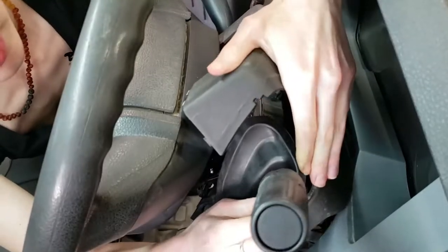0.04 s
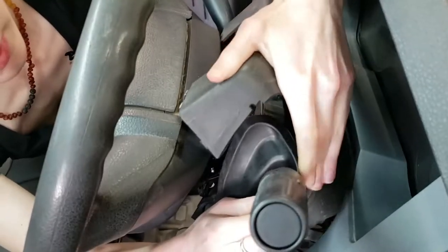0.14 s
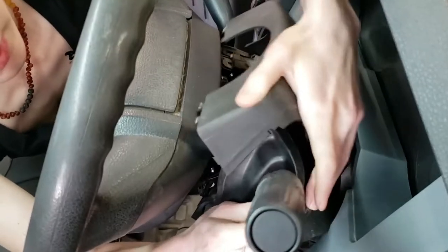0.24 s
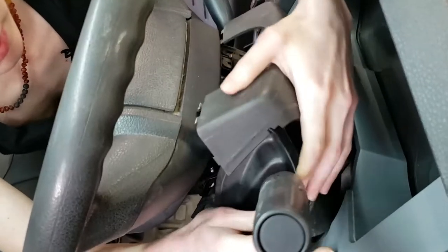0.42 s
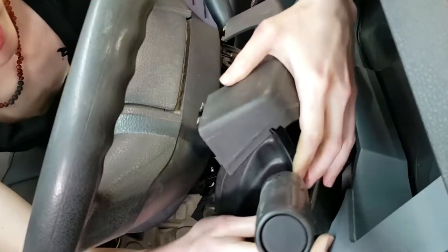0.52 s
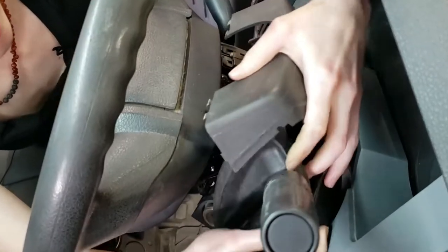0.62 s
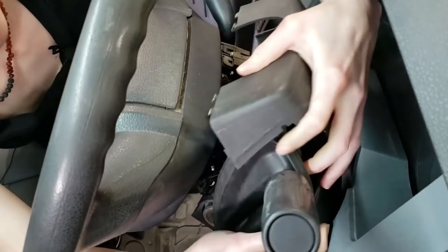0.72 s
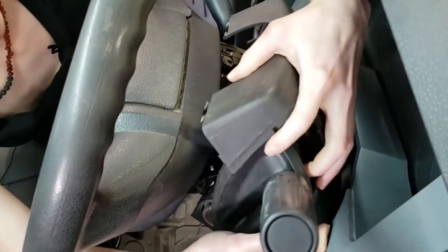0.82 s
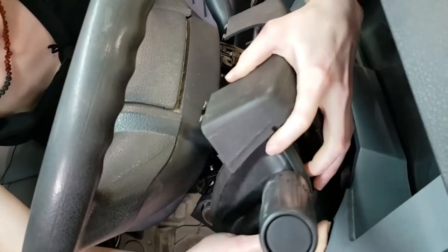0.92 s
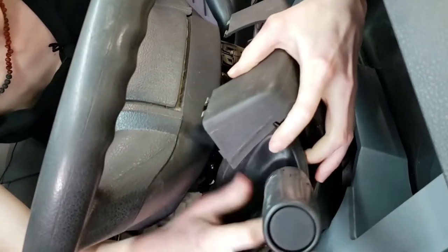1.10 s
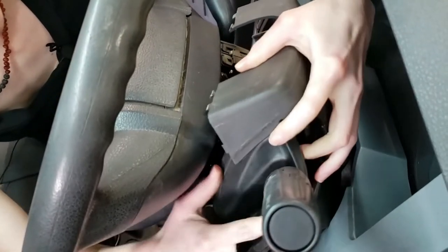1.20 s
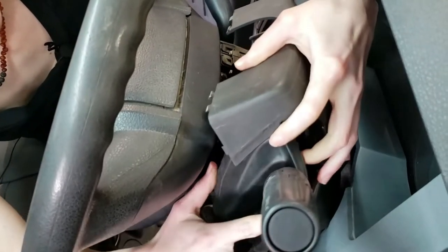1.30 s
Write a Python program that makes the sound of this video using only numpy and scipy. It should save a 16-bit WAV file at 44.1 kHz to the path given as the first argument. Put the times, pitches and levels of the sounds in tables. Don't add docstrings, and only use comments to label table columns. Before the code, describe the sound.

A hollow plastic cover is pressed into place, close and dry in a quietly humming car cabin. Faint scrapes and ticks lead to a loud, tight clatter of knocks at 0.2-0.26 s with a dull low thud. Small irregular creaks run from 0.3 to 0.6 s, ending in a light rattle. A crisp tap lands at 0.8 s, faint scuffs around 1.0-1.1, a softer tap at 1.19, then tiny scrapes.

```python
import sys
import numpy as np
from scipy import signal
from scipy.io import wavfile
from scipy.ndimage import uniform_filter1d

SR = 44100
rng = np.random.default_rng(int(sys.argv[2]) if len(sys.argv) > 2 else 0)


def undo_db(level):
    steps = np.asarray(level, float) / 20
    return 10 ** steps


def int16_out(signal):
    q = np.round(np.clip(np.atleast_2d(signal).T, -1, 1) * 32767)
    wavfile.write(sys.argv[1], SR, q.astype(np.int16))


N = 59535


def evened(x):
    return x / np.sqrt(np.mean(x ** 2) + 1e-20)


def read(points, hz):
    f, value = np.transpose(points)
    return np.interp(np.log(hz + 1), np.log(f + 1), value)


def add(mix, s, sound):
    part = mix[max(round(s * SR), 0):][:len(sound)]
    part += sound[:len(part)]


def progress(length_s):
    return np.arange(0, length_s, 1 / SR) / length_s


def causal(db):
    log = np.log(undo_db(np.concatenate([db, db[-2:0:-1]])))
    return np.fft.ifft(np.exp(np.conj(signal.hilbert(log)))).real[:2048]


def ring(modes, tune=1, damp=1):
    t = np.arange(4096) / SR
    return sum(undo_db(db - 60 * damp * t / t60) * np.sin(2 * np.pi * hz * tune * t)
               for hz, db, t60 in modes)


def struck(modes, tune=1):
    contact_s = .0004
    blow = np.convolve(np.hanning(round(contact_s * SR)), ring(modes, tune))
    return blow / abs(blow).max()


def impacts(shape, per_s, spread_db):
    chance, size, sign = rng.random((3, 12000))[:, :len(shape)]
    hits = (chance < per_s / SR) * undo_db(-spread_db * np.log(size + 1e-3)) * np.sign(sign - .5)
    return evened(hits + 1e-9) * shape


def noise(colour, size, patchy_db):
    hz = np.fft.rfftfreq(size, 1 / SR)
    re, im, patch = rng.standard_normal((N * 4 // size + 5, len(hz), 3)).T
    patch = uniform_filter1d(patch, 9, 0)
    patch = evened(uniform_filter1d(patch, 7, 1))
    spectra = (re + 1j * im) * undo_db(read(colour, hz)[:, None] + patchy_db * patch)
    return evened(signal.istft(spectra, nperseg=size, noverlap=size * 3 // 4)[1][:N])


# t/s, f/Hz, peak/dB, rise/s, T60/s
THUDS = [(0.061, 82.1, -41, 0.02, 1), (0.132, 97, -31.5, 0.012, 0.13), (0.188, 92.9, -24, 0.0064, 0.37),
         (0.23, 66.7, -23.5, 0.024, 0.14), (.31, 55.4, -34.5, 0.031, 0.27),
         (0.627, 162, -34.5, 0.016, 0.04), (.655, 89.8, -27.5, 0.027, 0.17), (0.898, 53, -45, 0.019, 0.28),
         (1.199, 62.4, -42.5, 0.018, 0.14), (1.264, 83.4, -48.5, 0.0086, 0.14), (.0, 112, -42, 0.036, 0.21),
         (.126, 335, -33, 0.0098, 0.046), (1.08, 486, -44.5, 0.022, 0.059), (1.338, 872, -45, 0.01, 0.019),
         (0.151, 181.3, -37, 0.017, 0.17), (.858, 102.5, -47, 0.016, .12)]


def column():
    out, t = np.zeros(N), np.arange(0, .4, 1 / SR)
    for s, hz, db, rise_s, t60 in THUDS:
        swell = np.sin(np.pi / 2 * np.minimum(t / rise_s, 1)) ** 2
        decay = undo_db(db - 60 * np.maximum(t - rise_s, 0) / t60)
        add(out, s, decay * swell * np.sin(2 * np.pi * hz * t))
    return out


# t/s, level/dB
RUB = [(0, -100), (0.069, -62), (0.109, -75.5), (.16, -60.5), (.3, -98), (0.349, -61.5), (0.401, -79.5),
       (0.551, -71), (.6, -59.5), (.7, -64), (0.851, -69.5), (.95, -82), (1.1, -64), (1.15, -91.5),
       (1.22, -62), (1.3, -92), (1.35, -81.5)]
# f/Hz, density/dB
SKIN = [(1500, -17), (2600, -4), (3300, -10), (5000, -14), (8500, -17), (11800, -10), (14000, -16.5),
        (16000, -20.5)]


def rub():
    level_db = np.interp(np.arange(N) / SR, *np.transpose(RUB))
    return undo_db(level_db) * noise(SKIN, size=256, patchy_db=1.5)


# f/Hz, density/dB
HUM = [(15, -32), (55, -3.5), (110, -11.5), (250, -22), (1100, -29), (2500, -47), (8000, -52),
       (12800, -52.5), (16000, -62)]


def hum():
    level_db = -52
    return undo_db(level_db) * noise(HUM, size=2048, patchy_db=1.5)


# f/Hz, level/dB, T60/s
SHELL = [(589, -7, 0.11), (740, -12.5, 0.038), (950, -5, 0.03), (1055, 6.5, 0.023), (1163, 4.5, 0.013),
         (1195, -5, 0.077), (1414, 1, 0.05), (1710, -4.5, 0.11), (2050, -5, 0.022), (2620, -14, 0.017),
         (505, -20.5, 0.17)]
# f/Hz, density/dB
CRACK = [(88, -39.5), (150, -21), (781, 2), (844, -8), (1110, -5.5), (1660, -11), (2100, -10.5),
         (3760, -33.5), (15500, -40.5)]


def shell(treble_db, tune, damp=1.4):
    crack_db, treble_hz = -5, 3000
    edge_hz, edge_db, edge_t60 = 4500, -40.5, 0.0066
    hz = np.fft.rfftfreq(4096, 1 / SR)
    plain_db = read(CRACK, hz)
    shelf_db = treble_db * hz ** 2 / (hz ** 2 + treble_hz ** 2)
    crack = causal(plain_db + shelf_db - 4.0 * (hz / 16000) ** 6)
    modes = ring(SHELL, tune, damp * max(tune, 1) ** 2)
    modes = modes + 10 * ring([(edge_hz, edge_db + treble_db, edge_t60)])
    out = modes / np.linalg.norm(modes)
    add(out, 0, undo_db(crack_db) * crack / np.linalg.norm(causal(plain_db)))
    return out


# t/s, length/s, level/dB, treble/dB, tuning/ratio
CLATTERS = [(.0115, 0.012, -37.5, -11, 0.39), (0.125, 0.01, -34.5, -12.5, 0.61),
            (0.196, 0.0046, -23, -2, 0.94), (0.1992, 0.012, -19.5, 10.5, 0.95),
            (0.228, 0.0081, -25, 8, 1.5), (0.2357, 0.0099, -11, 6, 1.18), (0.2459, 0.0096, -24.5, 7, 1.5),
            (0.252, 0.015, -27, 1.5, 0.74), (0.287, 0.0056, -35.5, -17, 0.68),
            (0.063, 0.0031, -61, 11, 0.7), (0.074, 0.0039, -56, 14, 1.6), (0.152, 0.015, -44.5, 14, 1.3),
            (0.61, 0.013, -39, 8.5, 1.0), (0.628, 0.009, -31, 9, 1.78), (0.676, 0.014, -48, -13, 1.8),
            (1.06, 0.0077, -56, -16, 1.06), (1.081, 0.0078, -48, 1, 1.1), (1.249, 0.017, -59, 27.5, 1.1),
            (1.341, 0.0065, -56, 30, 0.79)]


def clatters():
    out = np.zeros(N)
    for s, length_s, db, treble_db, tune in CLATTERS:
        u = progress(length_s)
        drive = impacts(np.minimum(.3 + u / .5, 1) * (1 - u ** 3), 6000, 1.5)
        add(out, s, undo_db(db) * signal.fftconvolve(drive, shell(treble_db, tune)))
    return out


# t/s, length/s, level/dB, treble/dB, tuning/ratio
SLIDES = [(0.018, 0.079, -43.5, -11, 0.98), (0.136, 0.068, -44.5, 1, 0.82), (.2, .07, -30.5, 11.5, 0.75),
          (0.238, 0.093, -41.5, 2, 0.62), (0.319, 0.071, -51, -10, 1.31), (.37, 0.2, -54.5, 15.5, 1.05),
          (0.557, 0.052, -50.5, 5, 1.16), (0.629, 0.055, -45, 11.5, 1), (.66, 0.124, -56, -3, 0.414),
          (.85, .12, -66, 1, 0.73), (0.96, 0.09, -66, 18.5, 1.63), (1.052, 0.075, -60.5, 17.5, 1.18),
          (1.198, 0.06, -66, 17, 1)]


def slides():
    out = np.zeros(N)
    for s, length_s, db, treble_db, tune in SLIDES:
        drive = impacts(np.sin(np.pi * progress(length_s)), 5000, 2.0)
        add(out, s, undo_db(db) * signal.fftconvolve(drive, shell(treble_db, tune)))
    return out


# t/s, peak/dB, tuning/ratio, crack/dB
KNOCKS = [(0.1977, -12, 1, -23), (0.2008, -6.5, 0.89, -16), (.2037, -7.5, 1.0, -21),
          (.2060, -9.5, 0.73, -23), (.2120, -11.5, .6, -6), (.2279, -10, 1.02, -14),
          (.2308, -5.5, .98, -12), (.2373, -4, 1.03, -12), (.2460, -3, .86, -14), (.2350, -3, 1.19, -14),
          (0.2403, -17, 0.97, -12), (0.2424, -5.5, 1.3, -20), (0.2549, -15, .8, -14),
          (.2586, -16, 0.61, -14), (0.04, -34.5, 1.4, -16), (.0635, -42, 1.1, -6), (0.0716, -43.5, 1, -8),
          (.0800, -39.5, 1.2, -8), (0.0921, -38, 0.8, -12), (.1155, -32, 0.97, -22), (.1265, -24, .75, -24),
          (.1295, -29, 0.51, -17)]
# f/Hz, level/dB, T60/s
DRUM = [(1070, 0, .02), (1290, -4, .018), (600, -13, .022), (2050, -7, .016), (3150, -15, .012)]


def knocks():
    out, treble_db = np.zeros(N), 12
    for s, db, tune, crack_db in KNOCKS:
        crack = shell(treble_db, tune)
        add(out, s, undo_db(db) * struck(DRUM, tune))
        add(out, s, undo_db(db + crack_db) * crack / abs(crack).max())
    return out


# t/s, length/s, level/dB, tuning/ratio, tilt/(dB/octave)
SCUFFS = [
    (0.991, 0.05, -52, 0.99, 2),
    (1.059, 0.015, -50.5, 0.96, -2),
    (1.073, 0.034, -52, 1.1, -1),
    (1.249, 0.018, -59, 1.02, 14),
    (1.338, .013, -48, 0.793, -2),
    (.04, 0.071, -47.5, 1.03, -1),
]
# f/Hz, level/dB, T60/s
FLAP = [(640, -7, .03), (1105, 0, .045), (1390, -10, .03), (1740, -1, .04), (2220, -6, .03),
        (2900, -14, .012), (4250, -16, .01), (4750, -18, .008), (5500, -19, .007)]


def scuffs():
    out = np.zeros(N)
    for s, length_s, db, tune, tilt_db in SCUFFS:
        tilted = [(hz, own_db + tilt_db * np.log2(hz / 1000), t60) for hz, own_db, t60 in FLAP]
        notes = ring(tilted, tune)
        drive = impacts(np.sqrt(np.sin(np.pi * progress(length_s))), 1500, 3.0)
        add(out, s, undo_db(db) * signal.fftconvolve(drive, notes / np.linalg.norm(notes)))
    return out


# t/s, peak/dB, brightness/dB
CREAK = [(0.312, -37, -36), (0.315, -33.5, -34), (0.324, -32, -36), (.332, -39, -32), (.339, -39, -22),
         (0.356, -36.5, -22), (0.367, -37.5, -30), (0.377, -30, -25), (0.396, -37.5, -35),
         (0.4163, -32, -19), (0.4342, -32, -17.5), (0.44, -40, -22), (0.453, -32, -23), (0.47, -34, -14.5),
         (0.486, -41, -12), (0.4988, -37, -13.5), (0.51, -41, -14), (.518, -42.5, -14), (0.523, -39, -17),
         (0.535, -38, -16), (0.551, -38, -17), (0.565, -37.5, -19), (0.574, -37, -12), (.578, -35, -18),
         (0.587, -43, -10), (0.588, -34.5, -13), (.599, -46, -7), (.605, -32, -16.5), (0.6103, -29.5, -10)]
CLIP = [(1110, -2, .016), (1290, -2, .016), (620, -10, .016), (1780, -8, .013)]
CLIP_EDGE = [(3750, -1, 0.011), (4370, 0.0, 0.012), (5350, -0.5, 0.0045), (7200, -12, .004)]


def creak():
    jolt_s, stutter = .003, .14
    out, lip = np.zeros(N), ring(CLIP_EDGE)
    u = np.arange(300) / SR / jolt_s
    for s, db, bright_db in CREAK:
        jolt, rasp = rng.standard_normal((2, 300))
        drive = (u == 0) + stutter * jolt * np.exp(-u)
        slip = signal.fftconvolve(drive, struck(CLIP, 1 + .03 * jolt[0]))
        hiss = signal.fftconvolve(rasp * np.exp(-u), lip)
        add(out, s, undo_db(db) * slip / abs(slip).max())
        add(out, s, undo_db(db + bright_db) * hiss / abs(hiss).max())
    return out


# t/s, peak/dB, contact/s, rebound/ratio, rebound delay/s
TAPS = [
    (0.8043, -10.5, 0.000031, 1.67, 0.001864),
    (1.188, -9.5, 0.0001, -2.5, .0009),
]
# f/Hz, level/dB, T60/s
TAP_MODES = [
    [(352, -11.5, 0.055), (491, -12, 0.057), (610, -20, 0.013), (770, 15, 0.027), (955, -11.5, 0.038),
     (1145, 0, 0.017), (1490, -8, 0.024), (2000, -23, 0.026), (2730, -18, 0.023), (4370, -26.5, .012)],
    [(378, 0, 0.033), (530, -29, 0.008), (630, -35.5, 0.0084), (833, 6, 0.015), (1050, -8.5, 0.026),
     (1530, -15.5, 0.008), (745, 18.5, 0.005), (1260, -19, 0.0024), (2280, -21, .015), (4430, -24, .008)],
]
TICK_DB = [-56, -61]
RATTLE_DB = [-28.5, -32]
RATTLE_T60 = [0.019, 0.013]


def taps():
    low_cut_hz, rattle_treble_db = 230, 13.5
    out, t = np.zeros(N), np.arange(0, .05, 1 / SR)
    rows = zip(TAPS, TAP_MODES, TICK_DB, RATTLE_DB, RATTLE_T60)
    for (s, db, contact_s, rebound, delay_s), modes, tick_db, rattle_db, t60 in rows:
        push = t * np.exp(-t / contact_s)
        add(push, delay_s, rebound * push[:1500])
        blow = np.convolve(push, ring(modes))
        add(out, s, undo_db(db) * blow / abs(blow).max())
        tick = np.diff(rng.standard_normal(400)) * np.exp(-np.arange(399) / 100.0)
        add(out, s, undo_db(tick_db) * tick)
        rattle = impacts(undo_db(rattle_db - 60 * t / t60), 5700, 0.88)
        add(out, s, signal.fftconvolve(rattle, shell(rattle_treble_db, 0.98, 3.7)))
    return signal.lfilter(*signal.butter(2, low_cut_hz, "high", fs=SR), out)


def cabin(x):
    t60, dull_hz = .07, 3000
    tail = np.zeros(9000)
    tail[np.arange(100, 8980, 20) + rng.integers(0, 20, 444)] = rng.choice([-1., 1.], 444)
    tail = tail * undo_db(-60 * np.arange(9000) / SR / t60)
    tail = signal.lfilter([1], [1, -np.exp(-2 * np.pi * dull_hz / SR)], tail)
    return signal.fftconvolve(x, tail / np.linalg.norm(tail))[:N]


def scene():
    low_cut_hz, cabin_db = 150, -15
    cover = clatters() + slides()
    plastic = cover + creak() + taps() + knocks() + scuffs()
    plastic = signal.lfilter(*signal.butter(2, low_cut_hz, "high", fs=SR), plastic)
    background = rub() + hum()
    return (plastic + undo_db(cabin_db) * cabin(plastic) + column() + background)[None]


def top_cut(x):
    return signal.sosfilt(signal.butter(12, 16030, fs=SR, output="sos"), x)


def record(dry):
    top_hz, ceiling = 16100, .95
    lowpass = signal.firwin(511, top_hz, window=("kaiser", 9), fs=SR)
    dry = signal.oaconvolve(dry, lowpass[None], "same")
    return top_cut(ceiling * np.tanh(dry / ceiling))


dry = scene()
out = record(dry)
int16_out(out)
```